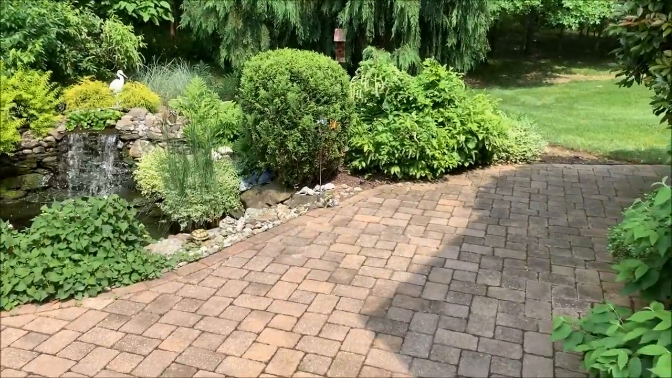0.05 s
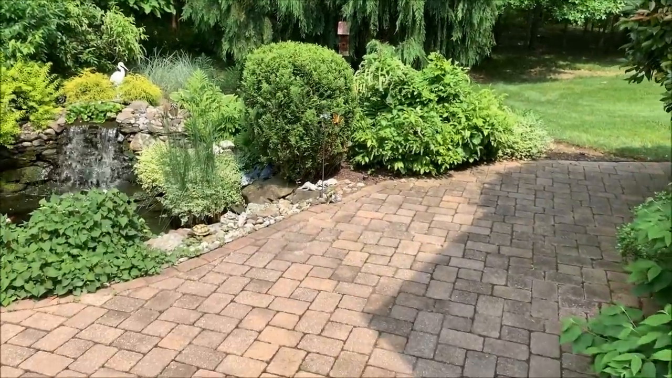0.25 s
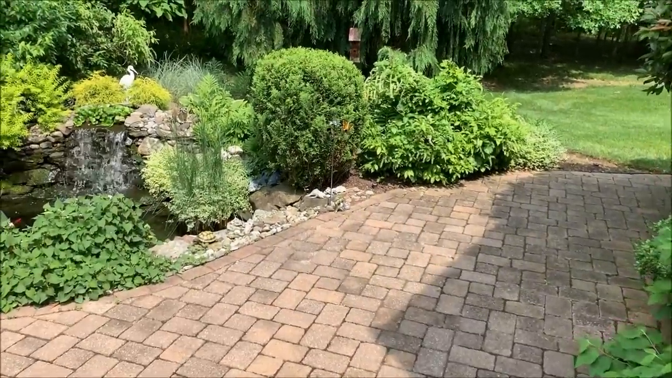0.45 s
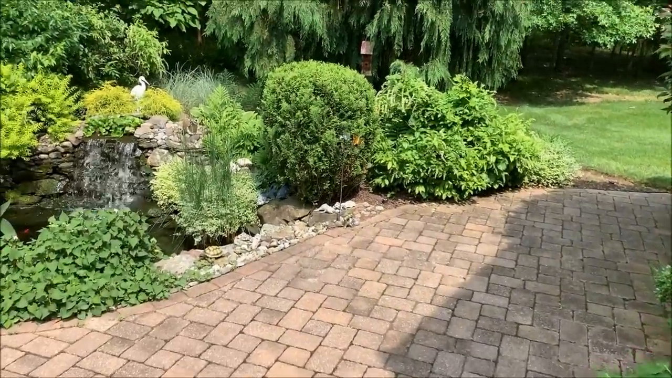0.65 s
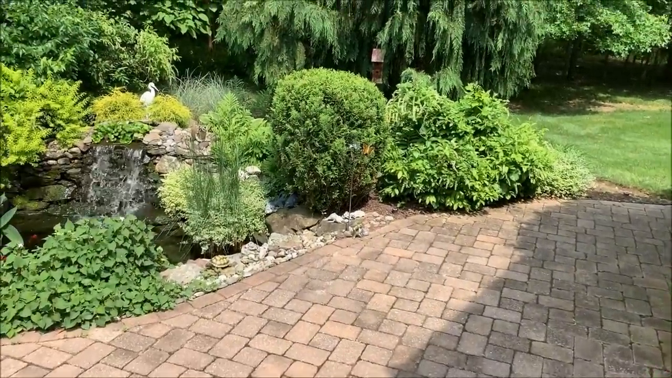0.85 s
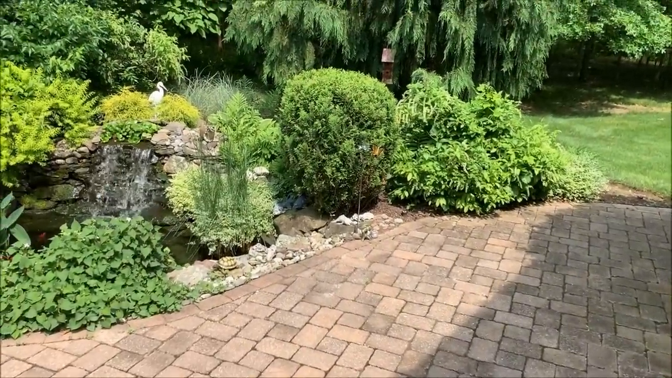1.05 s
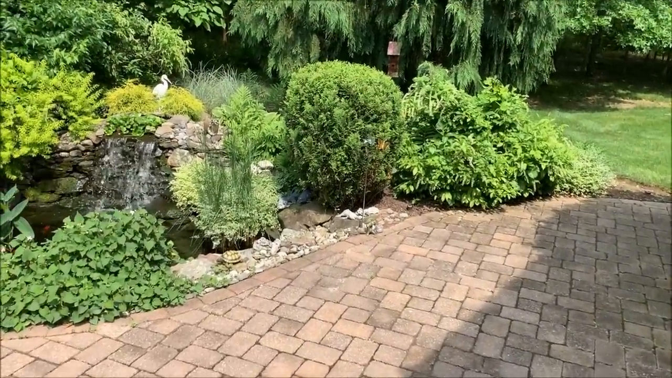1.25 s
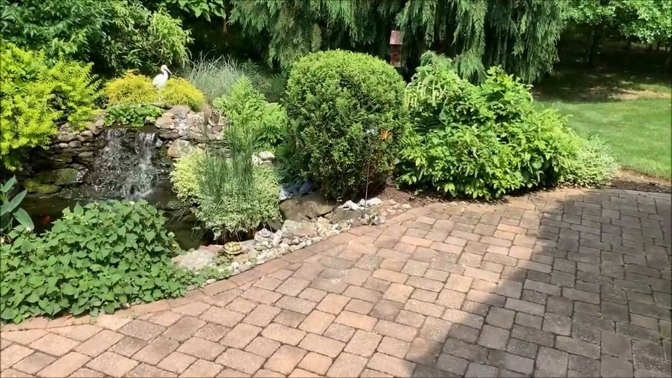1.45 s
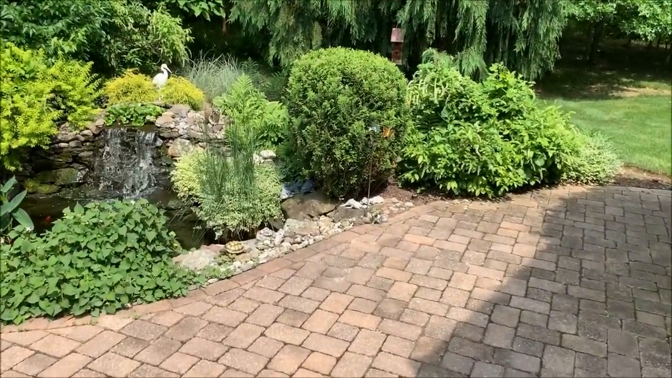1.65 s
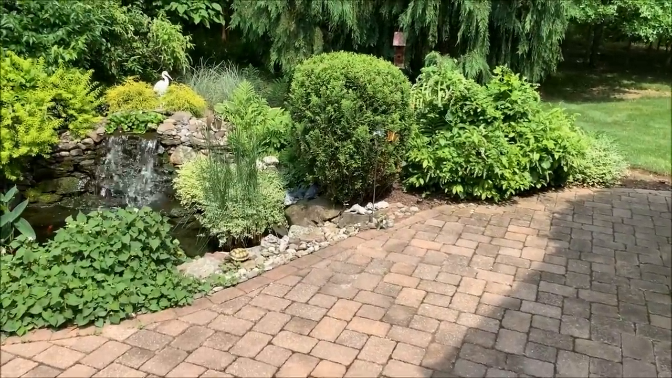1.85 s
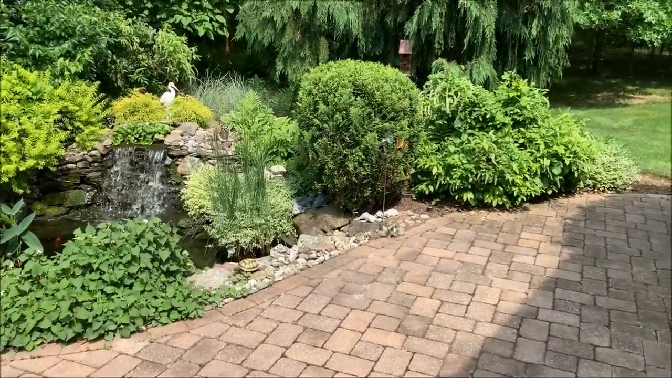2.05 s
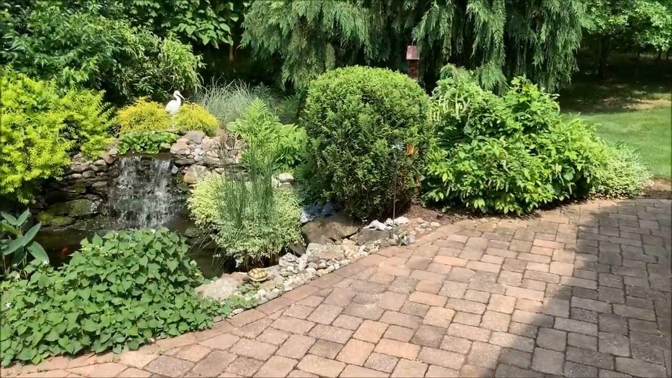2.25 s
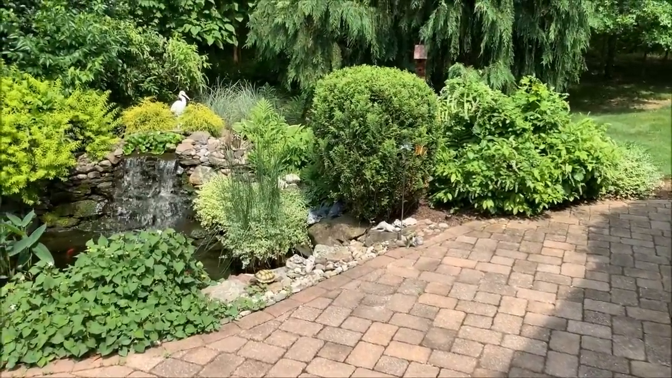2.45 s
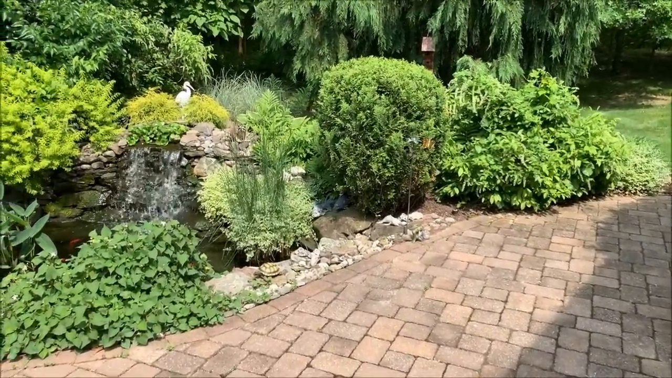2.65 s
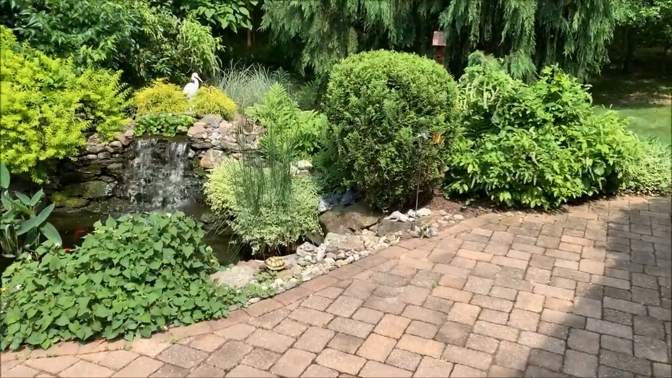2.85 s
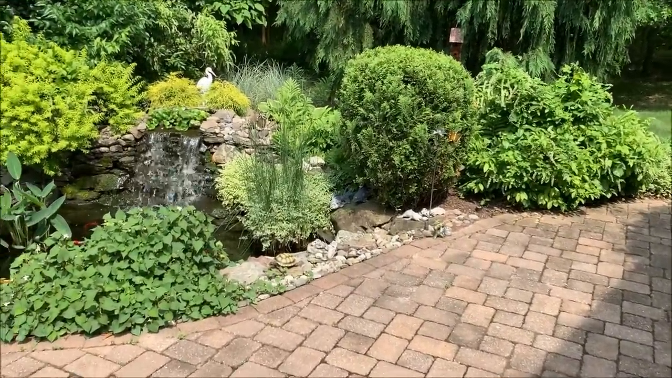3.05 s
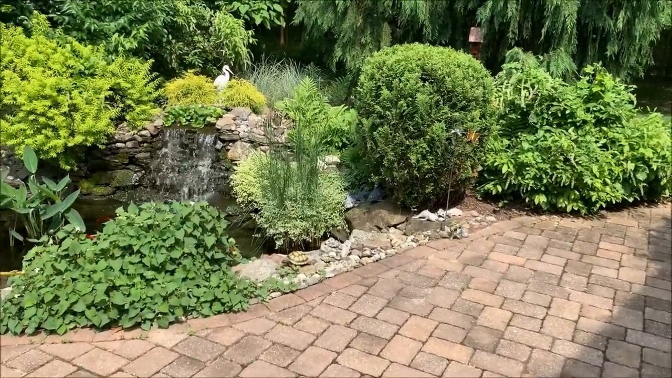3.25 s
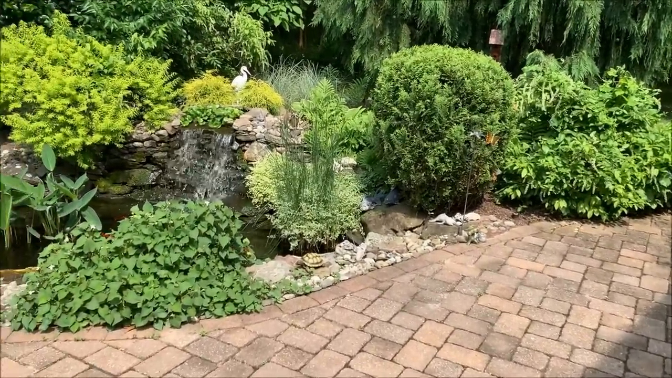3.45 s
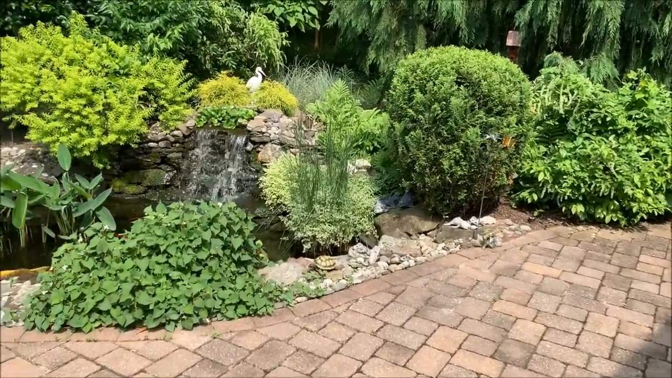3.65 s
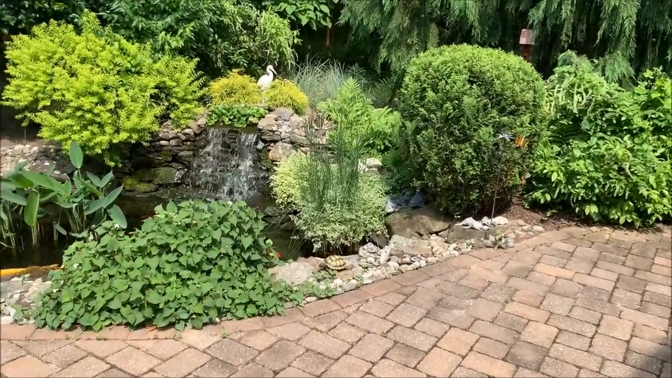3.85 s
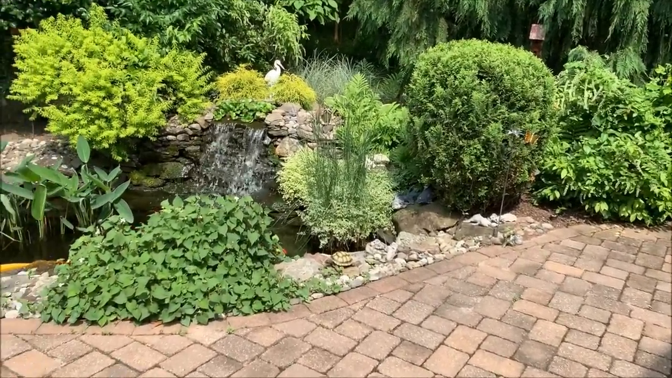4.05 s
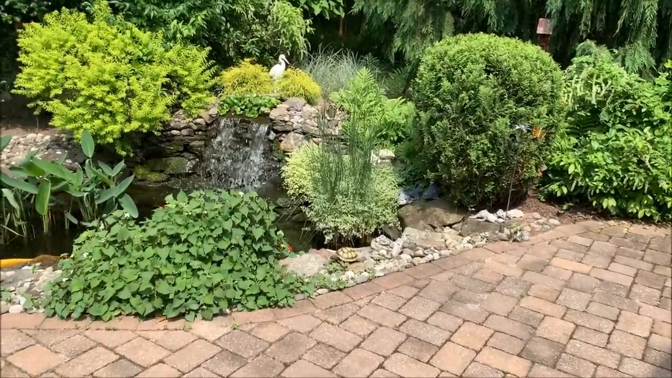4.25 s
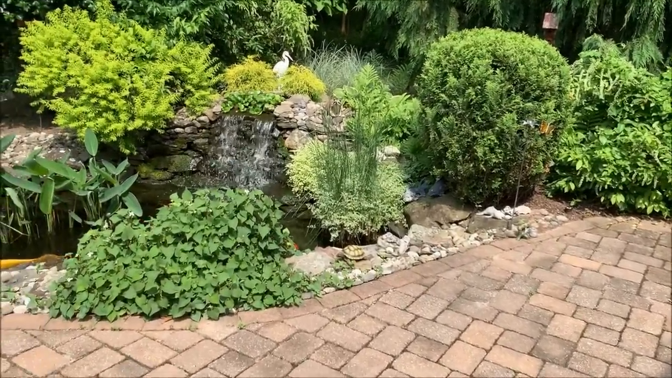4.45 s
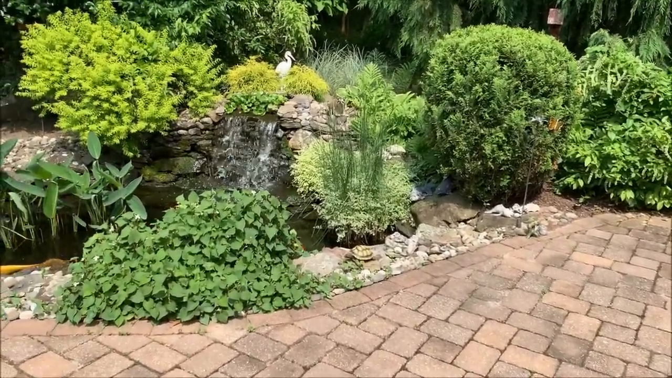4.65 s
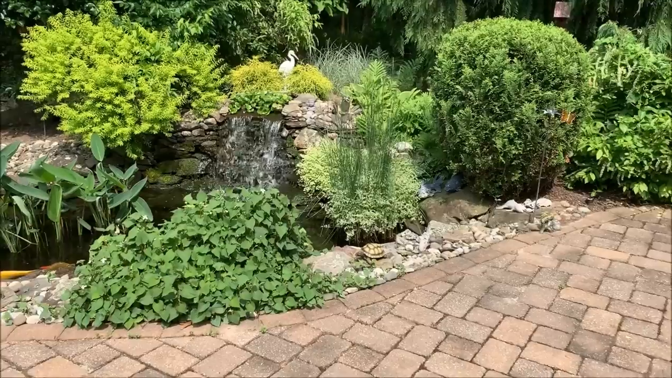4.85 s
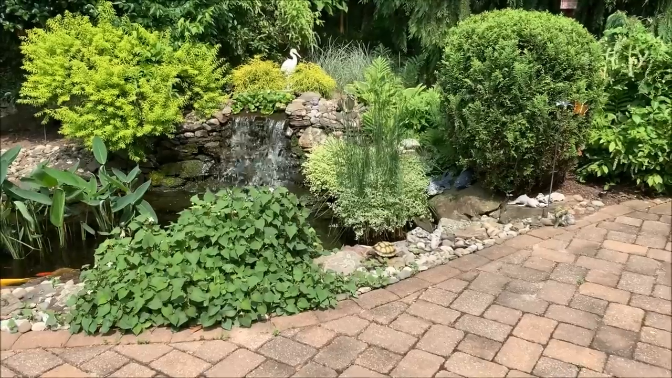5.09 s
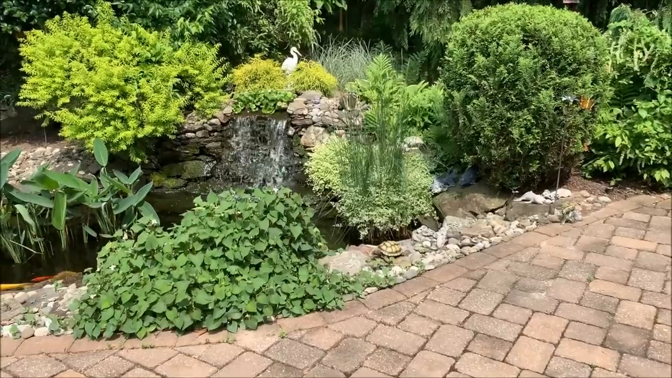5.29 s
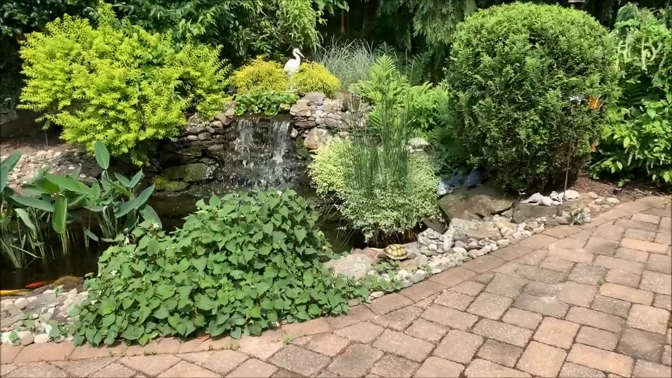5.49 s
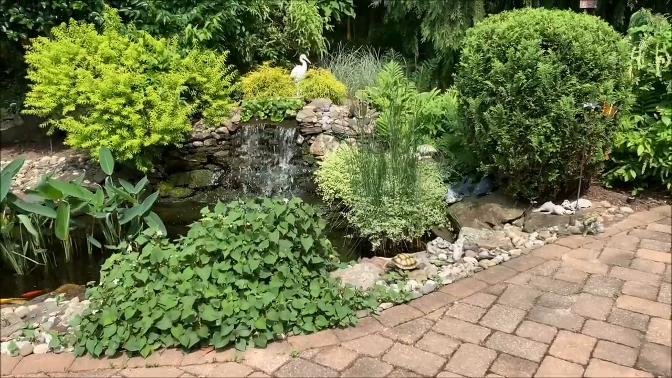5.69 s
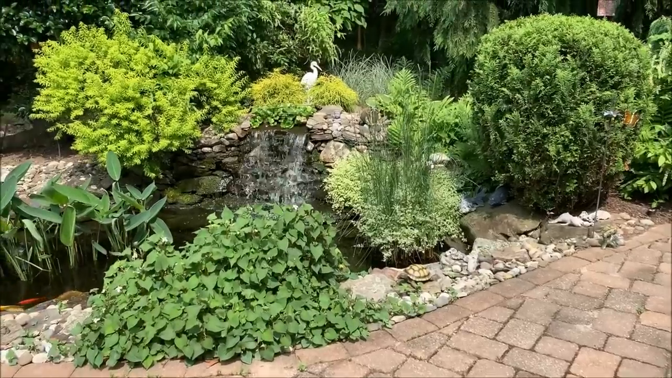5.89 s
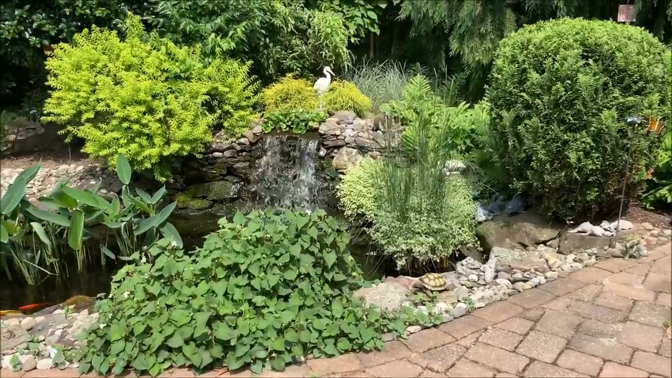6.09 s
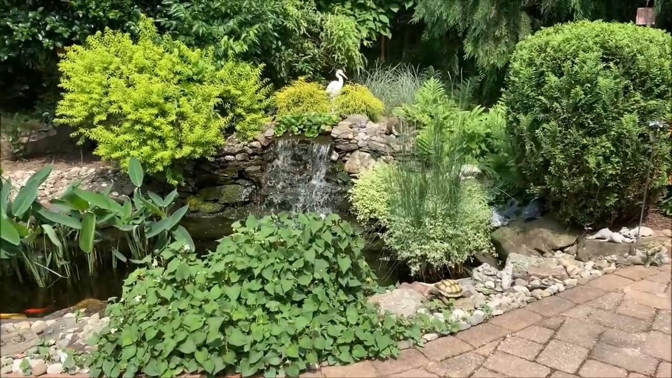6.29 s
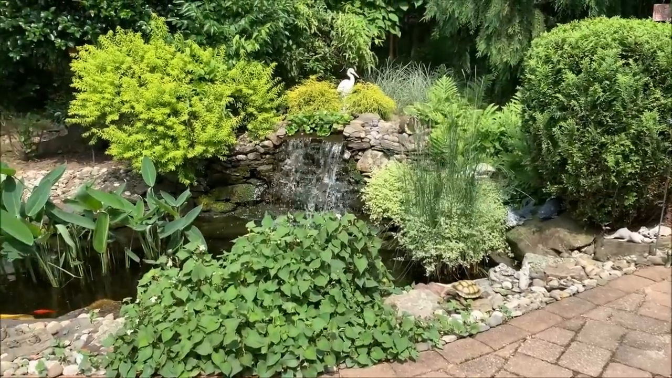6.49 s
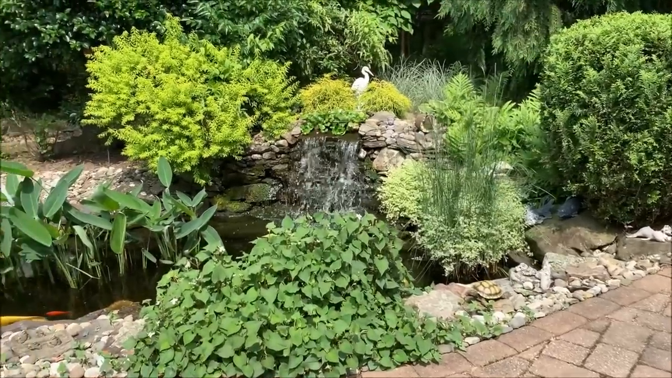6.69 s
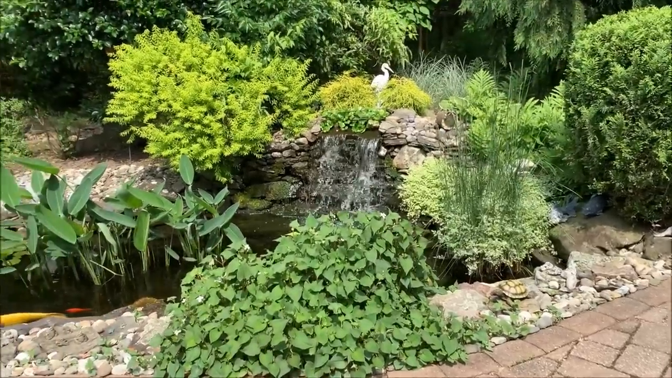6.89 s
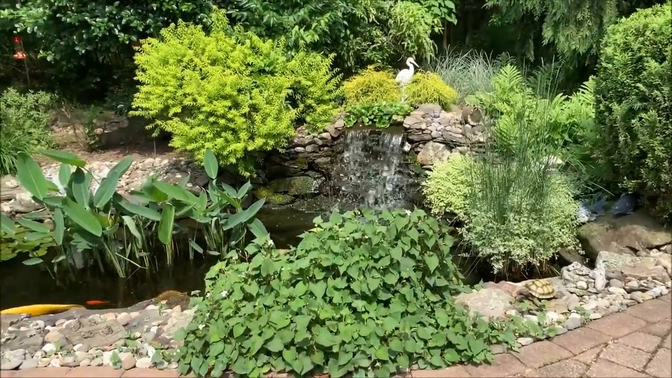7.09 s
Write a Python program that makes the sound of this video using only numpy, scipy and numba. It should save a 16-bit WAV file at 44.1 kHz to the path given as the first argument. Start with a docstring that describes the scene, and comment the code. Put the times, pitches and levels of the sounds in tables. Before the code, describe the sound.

A small rock waterfall pours continuously into a garden pond outdoors. Its hissy, bubbling trickle is scattered with rounded plops and sharp little ticks on stone, with a bright cluster of plops at one second. A wavering low motor drone lies underneath, strengthening later, and a far engine climbs in pitch near the end. The handheld stereo microphone moves slowly closer, and the fall shifts from the left to the centre.

```python
"""A thin sheet of water falls over rocks into a garden pond; the listener walks closer and turns towards it.
Bubbles are dying sines that rise in pitch, spray ticks on stone are short high ones, the churn is noise.
Nearby a motor drones: a wavering tone, hums and low noise. A far engine revs once as two climbing tones.
Two microphone ports a hand apart hear the fall with a lag, up to about 6 kHz, that shrinks from the left
to the front and ends slightly past it."""
import sys
import numpy as np
from scipy import signal
from scipy.fft import rfft, irfft, next_fast_len
from scipy.io import wavfile
from scipy.ndimage import map_coordinates
from numba import njit

SR = 44100
rng = np.random.default_rng(int(sys.argv[2]) if len(sys.argv) > 2 else 0)


def output_pcm(signal):
    """Save a mono or channel-first signal as 16-bit PCM at the path in sys.argv[1].

    Samples are clipped to [-1, 1] before scaling.
    """
    pcm = np.clip(np.atleast_2d(signal).T, -1, 1) * 32767
    wavfile.write(sys.argv[1], SR, np.round(pcm).astype(np.int16))


N = 314433
SIZE = next_fast_len(N)  # transform length [samples]
HZ = np.maximum(np.arange(SIZE // 2 + 1) * SR / SIZE, 1)  # its frequencies, kept above 0 for log axes

# The fall as the listener nears, before its gushes: (time [s], plunge level [dB], spray level [dB])
FALL_LEVELS = [(0, -40.5, -45), (.93, -39.5, -45.5), (1.37, -39.5, -44), (1.91, -40, -45),
               (2.26, -38.5, -43), (2.62, -39.5, -44), (2.92, -40, -40.5), (3.1, -39.5, -43),
               (3.59, -38.5, -44), (4.05, -39.5, -43.5), (4.23, -39, -42.5), (4.67, -39.5, -41.5),
               (5.34, -38, -44), (5.64, -39, -41.5), (6.19, -37.5, -44), (6.93, -37.5, -41.5),
               (7.13, -39.5, -36)]
# Loudest bubbles, before their swell and pitch rise: (time [s], level [dB], pitch [Hz])
PLOPS = [(0.486, -33, 1490), (0.765, -28, 3660), (0.894, -24.5, 1680), (0.896, -28, 2530),
         (0.92, -37, 3380), (0.952, -29, 1860), (0.977, -32, 1360), (0.991, -14.5, 2060),
         (0.995, -19, 2210), (0.998, -22, 2210), (1.017, -39, 3730), (1.023, -29, 2150), (1.028, -31, 2050),
         (1.066, -31, 2290), (1.219, -33.5, 1130), (1.258, -33, 3300), (1.274, -33, 1430),
         (1.295, -30, 2500), (1.483, -40, 620), (1.528, -35, 583), (1.562, -35.5, 850), (1.605, -35, 1000),
         (1.64, -36, 880), (1.792, -32.5, 1440), (1.872, -34, 1740), (1.91, -44, 1110), (1.99, -36, 1200),
         (2.11, -34, 1600), (2.166, -28.5, 1550), (2.366, -45, 1540), (2.208, -27, 2700),
         (2.262, -37, 3445), (2.412, -30, 3000), (2.837, -34.5, 580), (3.047, -31, 2950),
         (3.056, -29.5, 1020), (3.111, -36, 1320), (3.346, -31, 2325), (3.373, -28, 2663),
         (3.44, -34, 1610), (3.625, -33, 826), (3.685, -38, 982), (3.729, -31.5, 1910), (3.742, -34, 1090),
         (3.9, -36, 1150), (3.958, -34, 2230), (4.051, -35, 992), (4.47, -28.5, 3740), (4.025, -29, 2470),
         (4.205, -37, 1340), (4.517, -35, 1390), (4.596, -34, 1640), (4.608, -32, 1240), (4.729, -38, 1410),
         (4.777, -27, 2460), (4.731, -39, 392), (5.104, -35, 986), (5.178, -34, 1580), (5.324, -32, 1000),
         (5.36, -35, 1400), (5.443, -36.5, 328), (5.586, -32.5, 375), (5.731, -30, 3720),
         (5.752, -33, 1860), (5.81, -37, 3870), (5.897, -35, 1290), (6.108, -37, 2290), (6.394, -40, 910),
         (6.409, -32, 2000), (6.059, -33, 3610), (6.165, -21, 4100), (6.224, -37.5, 332),
         (6.464, -26, 1680), (6.538, -37.5, 969), (6.549, -36, 1010), (6.616, -32, 1500),
         (6.622, -37, 3040), (6.697, -32, 3531), (6.7, -33, 1400), (6.739, -30, 1930), (6.832, -32, 2240),
         (6.876, -37, 1560), (6.916, -37, 3531), (6.945, -35, 1020), (7.007, -30.5, 1460),
         (7.033, -34, 5040), (7.034, -26, 2520), (7.048, -26, 2530)]
# Loudest drops on stone, before their swell and pitch rise: (time [s], level [dB], pitch [Hz])
TICKS = [(0.737, -27, 7800), (0.843, -30, 7400), (1.107, -27.5, 7200), (2.078, -31, 8250),
         (2.091, -27, 8310), (2.578, -34, 7120), (3.1205, -38, 7890), (3.254, -37, 8440),
         (3.786, -30, 7400), (3.978, -33, 7300), (4.257, -29.5, 7480), (4.757, -25, 7700),
         (4.997, -35, 8200), (5.182, -29.5, 8000), (5.236, -28, 8760), (5.376, -34, 7160),
         (5.5693, -22, 8900), (5.6824, -34, 8150), (5.8374, -28, 8340), (6.1602, -33, 8200),
         (7.0187, -28.5, 8160), (7.087, -24, 9190)]
# Finest spray drops, before their swell and pitch rise: (time [s], level [dB], pitch [Hz])
SPITS = [(0.9523, -41, 11800), (1.8961, -37, 12700), (2.2508, -38, 12100), (2.4948, -31, 13500),
         (2.6968, -31, 12100), (2.8599, -31, 12100), (2.9318, -33, 13000), (3.3733, -31, 14100),
         (3.5788, -34, 13700), (3.7868, -29, 12500), (3.8572, -36, 12300), (3.9784, -31, 12000),
         (4.8095, -37, 12300), (5.5683, -36, 11600), (5.6825, -36, 12600), (6.0013, -32, 12600),
         (6.2228, -36, 13100), (6.5241, -35, 13300)]
# Ragged splashes: (time [s], level before the fade [dB], centre [Hz], fade length [s])
SPLASHES = [(0.997, -48, 2300, 0.005), (3.038, -48, 2800, .02), (4.478, -47, 3275, .02),
            (6.156, -41, 4240, 0.024), (6.459, -46, 1715, 0.024), (6.59, -43, 3900, 0.024),
            (6.693, -45, 2810, 0.07), (6.91, -41, 2960, 0.016), (7.028, -40, 3750, 0.049)]
# Colour of the water at one port: (frequency [Hz], density [dB per Hz])
WATER_COLOUR = [(150, -5.5), (300, 3), (600, 0.5), (800, -0.5), (1100, 0), (1600, 0), (2100, -2),
                (2700, -0.5), (3300, -4), (3900, -3.5), (4500, -7), (5900, -9), (7000, -5), (8500, -1.5),
                (10000, 0), (13000, -4.5), (14200, -7.5), (15000, -4.5), (16000, -24)]
# Share of the water that arrives straight, alike at both ports: (frequency [Hz], share [0-1])
STRAIGHT_SHARE = [(150, 0.8), (350, 0.77), (700, 0.32), (1000, 0.67), (1500, 0.71), (2300, 0.2),
                  (3200, 0.39), (4600, 0.36), (6000, 0), (7100, 0.6), (9000, 0.75), (12000, 0.86),
                  (16000, 0.3)]
# Share of the wash that both ports hear alike: (frequency [Hz], share [0-1])
WASH_ALIKE = [(150, .05), (1800, .05), (2300, .85), (2800, .98), (3500, .98), (3900, .4), (4400, .1),
              (6200, .1), (7000, .95), (8800, .4), (10400, .97), (12000, .4), (13800, .97), (16000, .6)]
# Phase of the right port against the left, the same at all times: (frequency [Hz], phase [radians])
PORT_PHASE = [(0, 0), (2200, 0), (3500, -2.9), (6000, -3.0), (7000, -.2), (7600, .1), (9800, 2.55),
              (10200, np.pi), (10850, np.pi), (11200, 3.75), (13200, 6.2), (14400, 6.35), (16000, 9.4)]
# Colour of the fall at the right port against the left: (frequency [Hz], gain [dB])
RIGHT_LIFT = [(300, .5), (1100, -1.2), (2000, 1.2), (2800, 0), (3300, .1), (3700, 1.4), (5300, 2.1),
              (6500, 0), (16000, 0)]
# Extra lag of the right port while the fall lies to the left: (time [s], lag [microseconds])
BEARING_LAG = [(0, 184), (2, 149), (3, 123), (3.6, 73), (5.2, 52), (5.9, 36), (6.6, -10), (7.13, -44)]
# Motor tone, before its waver: (time [s], level [dB])
MOTOR_TONE = [(0, -45.5), (.7, -48), (1.1, -36.5), (1.5, -49), (1.65, -37.5), (1.75, -57), (1.85, -40),
              (2.1, -62), (2.3, -38.5), (2.55, -36.5), (2.8, -42), (3.2, -37.5), (3.33, -45), (3.45, -34),
              (3.6, -38.5), (3.77, -31), (3.9, -39), (4.0, -33), (4.2, -46.5), (4.45, -29.5), (4.75, -35),
              (5.1, -28.5), (5.26, -28), (5.5, -32), (5.62, -27.5), (5.84, -33.5), (5.96, -27),
              (6.12, -33.5), (6.33, -29.5), (6.41, -32.5), (6.48, -28.5), (6.64, -35), (6.8, -30),
              (6.96, -33), (7.04, -30), (7.13, -34)]
# Its overtones, before their waver: (time [s], second level [dB], third level [dB])
MOTOR_OVERTONES = [(0, -67, -60), (1.2, -46, -57.5), (2.5, -56, -70.5), (4, -56, -57), (4.6, -47, -64),
                   (5.2, -45.5, -55), (5.7, -58, -52), (6.2, -50, -65), (6.45, -36, -51), (6.7, -43, -58),
                   (7.13, -48, -50)]
# Further hums in the drone: (early pitch [Hz], late pitch [Hz])
HUM_PITCHES = [(77.5, 69), (95, 100), (114, 113.5), (146.5, 146)]
# Each hum, before its waver: (time [s], four levels in the order of the pitches [dB])
HUM_LEVELS = [(0.0, -57, -59, -45, -73), (0.16, -47, -53, -41, -58), (0.24, -49, -40, -58, -53),
              (0.34, -39, -51, -51, -58), (0.54, -58, -46, -42.5, -60), (0.65, -42.5, -56, -61, -54),
              (0.85, -45, -43, -49, -65), (0.97, -53, -60, -43, -60), (1.03, -50, -43.5, -50, -52),
              (2.06, -47, -54.5, -59, -51), (2.14, -53, -42, -51, -47), (2.8, -55, -59, -47, -61),
              (3.2, -46, -37, -61, -62), (3.28, -48, -63, -50, -66), (3.39, -41, -41.5, -55, -54),
              (3.97, -57, -48, -49, -46), (4.15, -47, -38, -55, -60), (4.49, -56, -46, -42.5, -54),
              (6.27, -41, -44, -48, -64), (7.13, -43, -48, -48, -57)]
# Noise of the motor, before its surges: (time [s], rumble level [dB], growl level [dB])
DRONE_LEVELS = [(0.0, -44, -55), (0.1, -45, -49), (1.0, -42.5, -48.5), (1.67, -45, -51.5),
                (2.2, -42.5, -51.5), (2.74, -42.5, -51), (3.6, -45, -51), (4.51, -43, -50.5),
                (5.2, -44.5, -49.5), (5.8, -41, -46), (6.37, -42, -48.5), (6.8, -44, -47), (7.13, -38, -49)]
# Colour of the rumble, relative: (frequency [Hz], density [dB per Hz])
RUMBLE_COLOUR = [(20, -19), (33, 5), (48, 6), (62, -4), (78, 1.5), (100, -0.5), (125, 2), (145, -4.5),
                 (200, -79)]
# Colour of the growl, relative: (frequency [Hz], density [dB per Hz])
GROWL_COLOUR = [(100, -55), (150, 4), (190, 3.5), (250, -4), (400, -35.5)]
# Tones of the far engine, before their waver: (multiple of its pitch, level [dB])
REV_ORDERS = [(1, -61), (2, -52.5)]

PLUNGE_GUSH_DB, SPRAY_GUSH_DB, GUSH_HZ = 1.25, 1.83, 12  # the flow comes unevenly
WASH_DB, WASH_DB_PER_S = 3, -0.32  # wash against straight sound; it shrinks as the listener nears
PLOP_CYCLES, PLOP_RISE = 27.7, 0.0047  # cycles to die by 60 dB, fractional pitch rise per first cycle
EDGE_DB, EDGE_HZ = -6, 9000  # bright edge of a tick: level against the tick [dB], pitch [Hz]
BEARING_TOP_HZ = 6200  # the bearing lag acts below this
MOTOR_HZ, LOADED_HZ, LOAD_AT_S, LOAD_TAKES_S = 61.15, 60.9, 5.7, 0.16  # turning rate drops under load
WAVER_DB, WAVER_HZ = 1.02, 8.3  # the motor tone wavers
SURGE_DB, SURGE_HZ = 1.87, 7.6  # rumble and growl each surge
HUM_SHIFT_S, HUM_WAVER_DB, HUM_WAVER_HZ, HUM_WANDER_HZ = 5.2, 3, 4.8, 1.17  # pitch shift and waver
REV_FROM_S, REV_TO_S, REV_LOW_HZ, REV_HIGH_HZ = 5.4, 6.4, 79.2, 121.9  # the climb of the far engine
REV_EDGE_S, REV_WANDER_HZ, REV_WAVER_DB = 0.043, 1.6, 5.5  # fades outside the climb, unsteadiness
CUTOFF_HZ = 15760


def waterfall():
    """Bubbles, spray and hiss arrive straight; rocks and shrubs return a smooth wash."""
    gushes_db = [PLUNGE_GUSH_DB * drift(GUSH_HZ), SPRAY_GUSH_DB * drift(GUSH_HZ)]
    plunge, spray = from_db(in_time(FALL_LEVELS)) * from_db(gushes_db)
    share = np.clip(at_hz(STRAIGHT_SHARE, HZ), 0, 1)
    colour = from_db(at_hz(WATER_COLOUR, HZ))
    straight = by_register(shaped(churn(), colour * np.sqrt(share)), plunge, spray)
    wash = by_register(rock_wash(colour, share), plunge, spray)
    wash = from_db(WASH_DB + WASH_DB_PER_S * np.arange(N) / SR) * wash
    # wash[0] joins the straight sound; the other two belong to one port each
    left, right = ports(straight + single_drops() + splashes() + wash[0]) + wash[1:]
    return np.array([left, shaped(right, from_db(at_hz(RIGHT_LIFT, HZ)))])


def churn():
    """Swarms of ringing bubbles, trickle and spray drops over an uneven hiss."""
    bubbles = swarm(2900, 198.05, 6406, cycles=45.0, rise=0.00435, swell=1.3,
                    spread_db=2.4, clump_db=2.5, clump_hz=16)
    trickle = swarm(350, 783.7, 2705, cycles=58.0, rise=0.00835, swell=2.7,
                    spread_db=2.5, clump_db=4.0, clump_hz=12)
    drops = swarm(4500, 6000, 17600, cycles=6.3, rise=0.0054, swell=0.15,
                  spread_db=3.5, clump_db=4.0, clump_hz=60.53)
    hiss = rng.standard_normal(N) * from_db(1.76 * drift(29))
    return from_db(-6.0) * bubbles + from_db(-11.5) * trickle + from_db(-2.0) * drops + from_db(-4.0) * hiss


def rock_wash(colour, share):
    """Three noises hold the energy that is not straight: one common to both ports, one for each port."""
    alike = np.clip(at_hz(WASH_ALIKE, HZ), 0, 1)
    shares = np.array([alike, 1 - alike, 1 - alike])
    return shaped(rng.standard_normal((3, N)), colour * np.sqrt((1 - share) * shares))


def single_drops():
    """Loud bubbles, drops on stone with a short bright edge, and the finest spray, each a rising ring."""
    plops = struck(PLOPS, PLOP_CYCLES, PLOP_RISE, swell=0.78)
    ticks = struck(TICKS, cycles=73.0, rise=0.0062, swell=3.6)
    edges = [(s, level_db + EDGE_DB, EDGE_HZ) for s, level_db, _ in TICKS]
    snaps = struck(edges, cycles=5.1, rise=.012, swell=.21)
    spits = struck(SPITS, cycles=41.0, rise=.004, swell=.4)
    return plops + ticks + snaps + spits


def splashes():
    """Each splash is a burst of crackling noise, 1.5 octaves wide, that starts at once and fades."""
    out, t = np.zeros(N), np.arange(4000) / SR
    for s, level_db, hz, length in SPLASHES:
        crackle_db = 1.9 * rng.standard_normal(100).repeat(40)  # a new level every 40 samples
        noise = rng.standard_normal(4000) * from_db(crackle_db)
        band_pass = signal.butter(2, [hz / 2.0, hz * 1.44], "band", fs=SR, output="sos")
        band = rms_one(signal.sosfilt(band_pass, noise))
        burst = from_db(level_db) * band * np.exp(-(t / length) ** 2)
        at = int(s * SR)
        out[at:at + 4000] += burst[:N - at]
    return out


def swarm(per_s, low_hz, high_hz, cycles, rise, swell, spread_db, clump_db, clump_hz):
    """Random grains in clumps; a few are much louder; heights grow with pitch so the sum is flat; rms 1."""
    busy = from_db(clump_db * drift(clump_hz))
    start = np.flatnonzero(rng.random(N) < per_s * busy / busy.mean() / SR)
    pitch, size, life, climb = rng.random((N // 2, 4))[:len(start)].T
    start = start[:len(pitch)]
    hz = low_hz * (high_hz / low_hz) ** pitch
    height = hz * from_db(spread_db * np.minimum(-np.log(size + 1e-9), 4.5))
    return rms_one(rings(N, SR, start, height, hz, cycles * (.5 + life), 2 * rise * climb, swell))


def struck(rows, cycles, rise, swell):
    """Single ringing grains at given moments."""
    s, level_db, hz = np.transpose(rows)[:3]
    start = (s * SR).astype(np.int64)
    return rings(N, SR, start, from_db(level_db), hz, cycles + 0 * s, rise + 0 * s, swell)


@njit
def rings(length, sr, start, height, hz, cycles, rise, swell):
    """Sines swell over some cycles and die at 60 dB per `cycles` while the pitch climbs; cut at 70 %."""
    out = np.zeros(length)
    for k in range(len(start)):
        step = hz[k] / sr  # cycles per sample
        fade = 10 ** (-3 * step / cycles[k])
        climb = 1 + rise[k] * step
        opening = np.exp(-step / swell)
        a, phase, shut = height[k], 0., 1.
        for i in range(start[k], min(length, start[k] + int(.7 * cycles[k] / step) + 2)):
            out[i] += a * (1 - shut) * np.sin(2 * np.pi * phase)
            phase += step
            step = min(step * climb, .45)  # stays below half the sample rate
            a *= fade
            shut *= opening
    return out


def by_register(x, plunge, spray):
    """The plunge level rules below 5 kHz, the spray level above."""
    low = signal.sosfilt(signal.butter(2, 5000, fs=SR, output="sos"), x)
    high = signal.sosfilt(signal.butter(2, 5000, "high", fs=SR, output="sos"), x)
    return plunge * low - spray * high  # the minus keeps the bands in phase where they cross


def ports(straight):
    """The right port has a fixed phase against the left, and its lows lag while the fall is to the left."""
    hz, radians = np.transpose(PORT_PHASE)
    right = rfft(straight, SIZE) * np.exp(1j * np.interp(HZ, hz, radians))
    low_share = 1 / (1 + (HZ / BEARING_TOP_HZ) ** 24)
    low = irfft(right * low_share, SIZE)[:N]
    high = irfft(right * (1 - low_share), SIZE)[:N]
    read_at = np.arange(N) - in_time(BEARING_LAG)[0] * SR / 10 ** 6
    return np.array([straight, map_coordinates(low, [read_at], order=3, mode="nearest") + high])


def motor():
    """A wavering tone at its turning rate with two overtones, over hums, a low rumble and a higher growl."""
    t = np.arange(N) / SR
    rate_hz = np.interp(t, [LOAD_AT_S, LOAD_AT_S + LOAD_TAKES_S], [MOTOR_HZ, LOADED_HZ])
    turn = 2 * np.pi * np.cumsum(rate_hz) / SR
    tone = 0
    for order, level_db in enumerate(in_time(MOTOR_TONE) + in_time(MOTOR_OVERTONES), start=1):
        waver_db = order * WAVER_DB * drift(WAVER_HZ)  # overtones waver more
        tone = tone + np.sqrt(2) * from_db(level_db + waver_db) * np.sin(order * turn)
    surges_db = SURGE_DB * np.array([drift(SURGE_HZ), drift(SURGE_HZ)])
    rumble_db, growl_db = in_time(DRONE_LEVELS) + surges_db
    rumble = low_noise(RUMBLE_COLOUR, rumble_db, side_db=-9.5)
    growl = low_noise(GROWL_COLOUR, growl_db, side_db=-9.5)
    return (tone + hums() + rumble + growl) * from_db([[-.3], [.3]])  # slightly to the right


def hums():
    """Unsteady low tones that shift in pitch once."""
    t, out = np.arange(N) / SR, 0
    for (early_hz, late_hz), level_db in zip(HUM_PITCHES, in_time(HUM_LEVELS)):
        hz = np.where(t < HUM_SHIFT_S, early_hz, late_hz) + HUM_WANDER_HZ * drift(HUM_WAVER_HZ)
        level = np.sqrt(2) * from_db(level_db + HUM_WAVER_DB * drift(HUM_WAVER_HZ))
        out = out + level * np.sin(2 * np.pi * np.cumsum(hz) / SR)
    return out


def low_noise(colour, level_db, side_db):
    """Coloured noise, nearly alike at both ports: a common part plus a weaker one of opposite sign."""
    mid, side = rms_one(shaped(rng.standard_normal((2, N)), from_db(at_hz(colour, HZ))))
    return from_db(level_db) * (mid + from_db(side_db) * side * [[1], [-1]])


def far_engine():
    """Two unsteady low tones climb together, the same at both ports."""
    t = np.arange(N) / SR
    climb_hz = np.interp(t, [REV_FROM_S, REV_TO_S], [REV_LOW_HZ, REV_HIGH_HZ])
    turn = 2 * np.pi * np.cumsum(climb_hz + REV_WANDER_HZ * drift(5.56)) / SR
    heard = np.clip(np.minimum(t - REV_FROM_S, REV_TO_S - t) / REV_EDGE_S + 1, 0, 1)
    tones = 0
    for order, level_db in REV_ORDERS:
        level = np.sqrt(2) * from_db(level_db + REV_WAVER_DB * drift(6.9))
        tones = tones + level * np.sin(order * turn)
    return heard * tones


def from_db(db):
    """Decibels to gain."""
    return 10 ** (np.asarray(db) / 20)


def rms_one(x):
    """Scales to rms 1."""
    return x / np.sqrt(np.mean(x ** 2) + 1e-20)


def in_time(rows):
    """The columns of a table at every sample."""
    s, *columns = np.transpose(rows)
    return [np.interp(np.arange(N) / SR, s, c) for c in columns]


def at_hz(points, hz):
    """A spectrum read on a log frequency axis."""
    point_hz, values = np.transpose(points)
    return np.interp(np.log(hz), np.log(point_hz), values)


def shaped(x, gain):
    """Applies a gain given at every frequency."""
    return irfft(rfft(x, SIZE) * gain, SIZE)[..., :N]


def drift(rate_hz):
    """Slow chance of rms 1: noise twice through a one-pole low-pass at the rate."""
    r = np.exp(-40 * np.pi * rate_hz / SR)  # drawn at every 20th sample
    slow = signal.lfilter([1], [1, -2 * r, r * r], rng.standard_normal(N // 20 + 2002))[2000:]
    return np.interp(np.arange(N) / 20, np.arange(len(slow)), rms_one(slow))


def scene():
    """Water, motor and far engine at the two ports."""
    return waterfall() + motor() + far_engine()


def record(dry):
    """The microphone's top is cut by a steep low-pass."""
    return signal.sosfilt(signal.ellip(12, .3, 70, CUTOFF_HZ, fs=SR, output="sos"), dry)


dry = scene()
out = record(dry)
output_pcm(out)
```